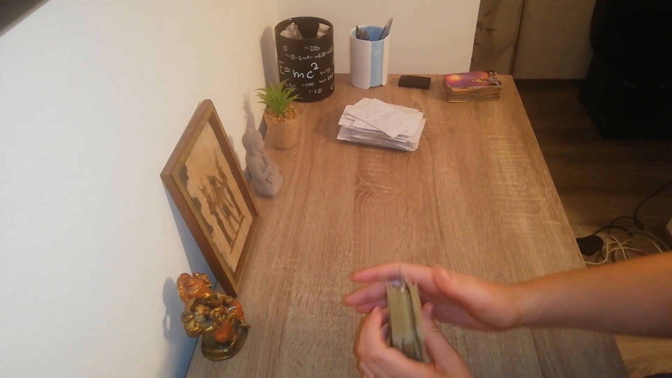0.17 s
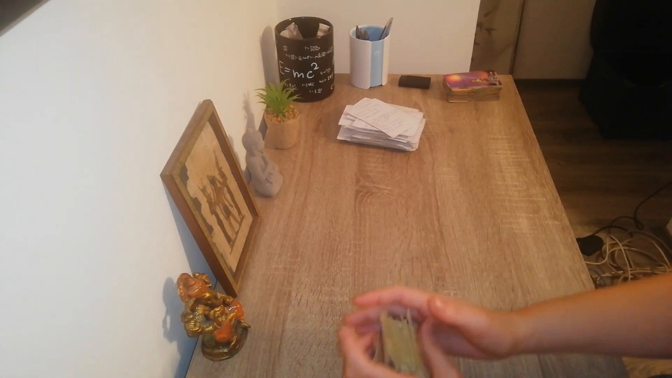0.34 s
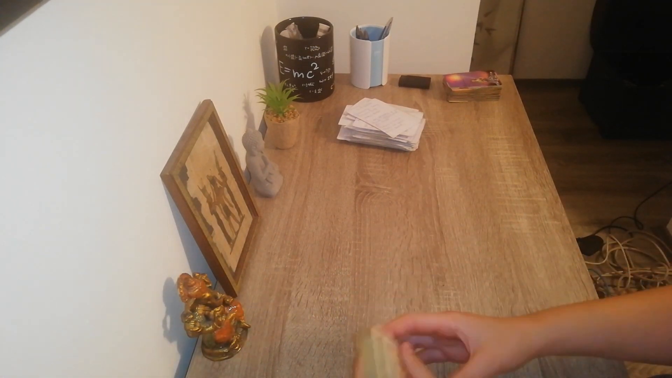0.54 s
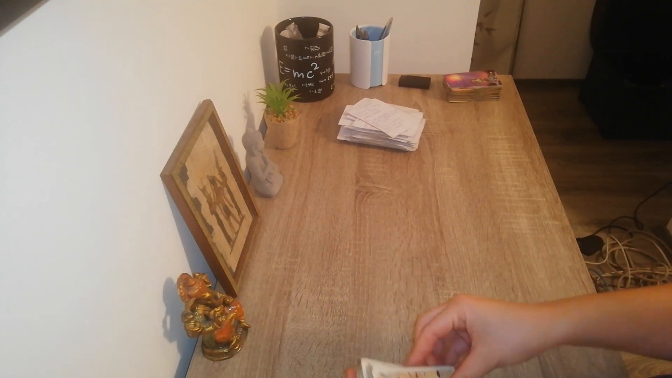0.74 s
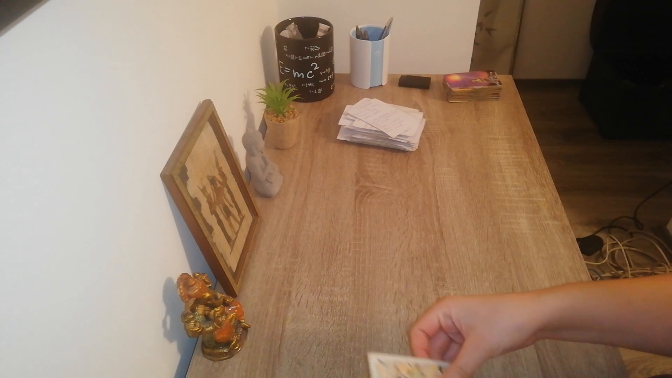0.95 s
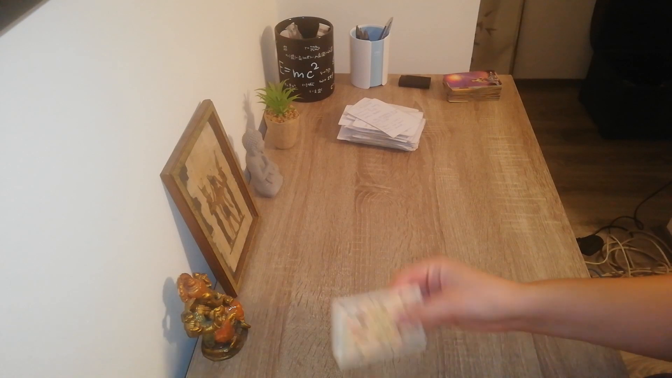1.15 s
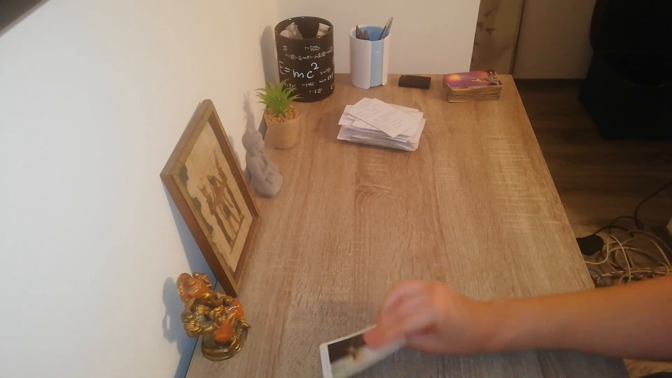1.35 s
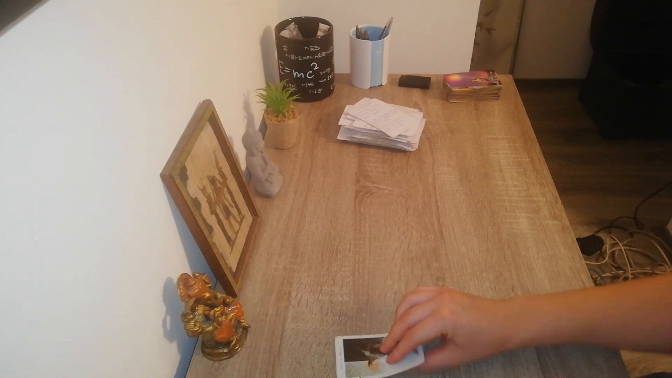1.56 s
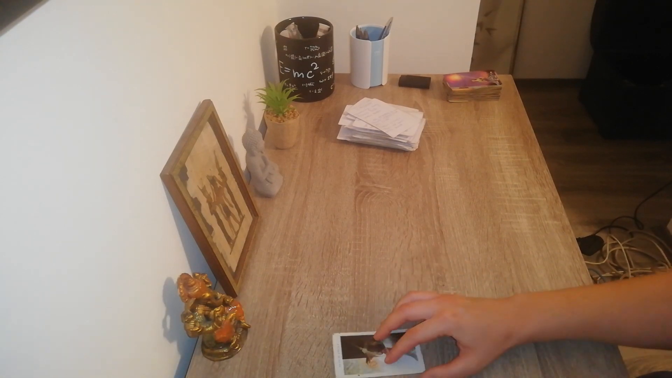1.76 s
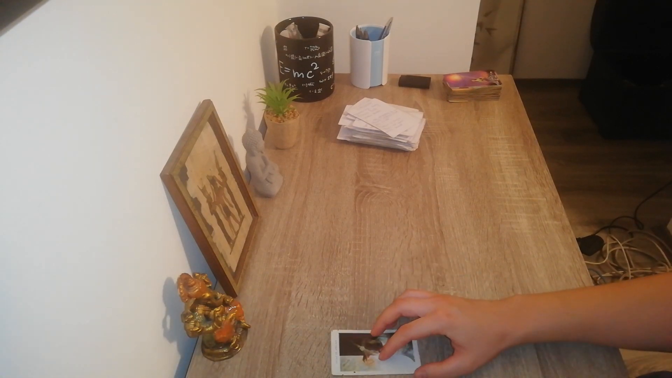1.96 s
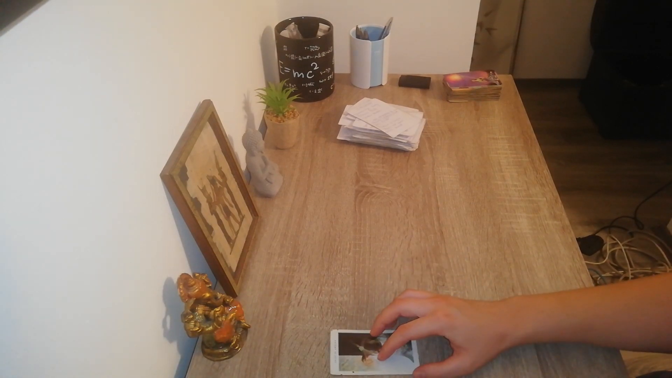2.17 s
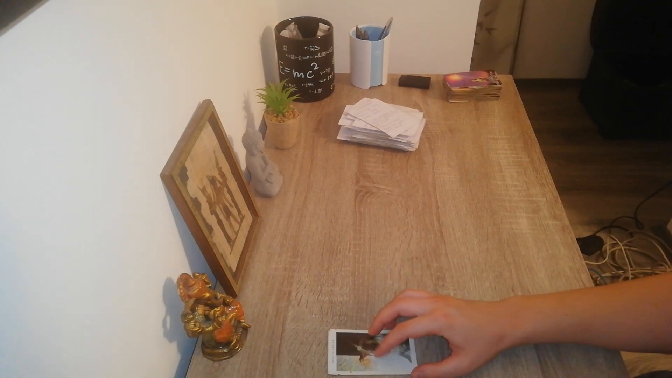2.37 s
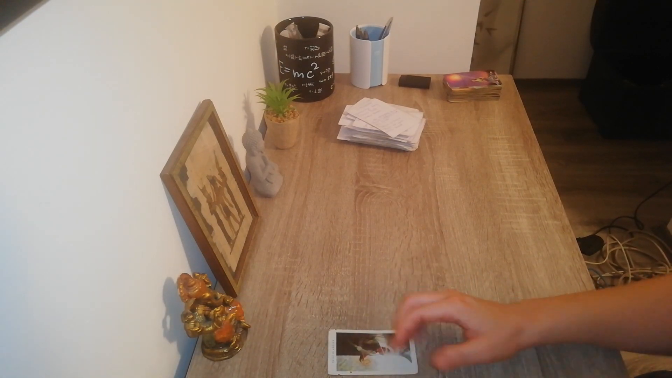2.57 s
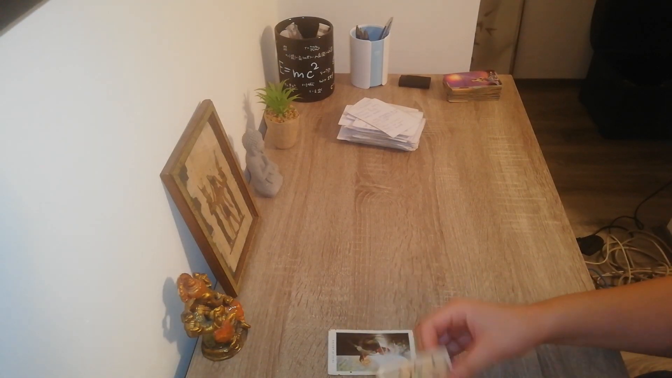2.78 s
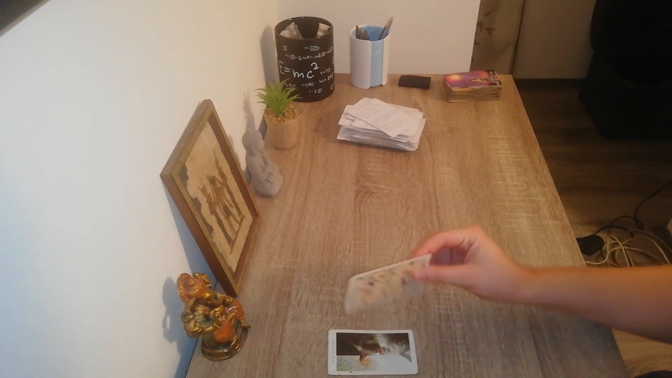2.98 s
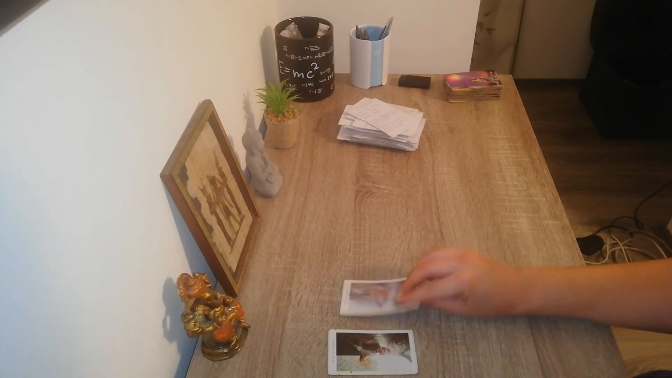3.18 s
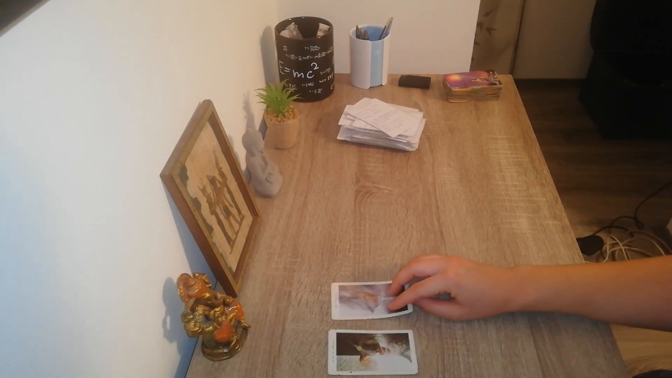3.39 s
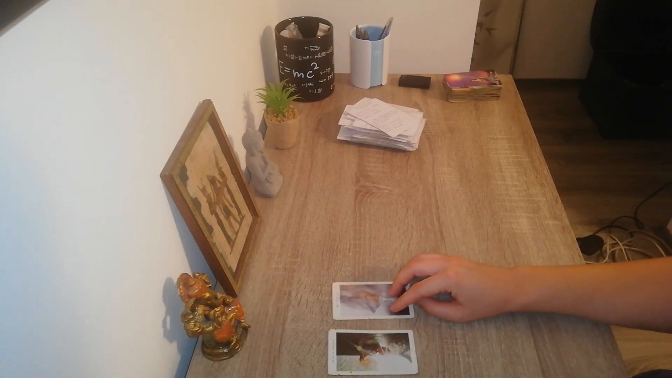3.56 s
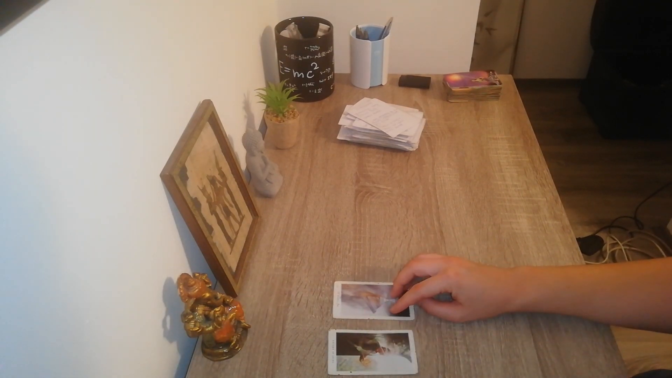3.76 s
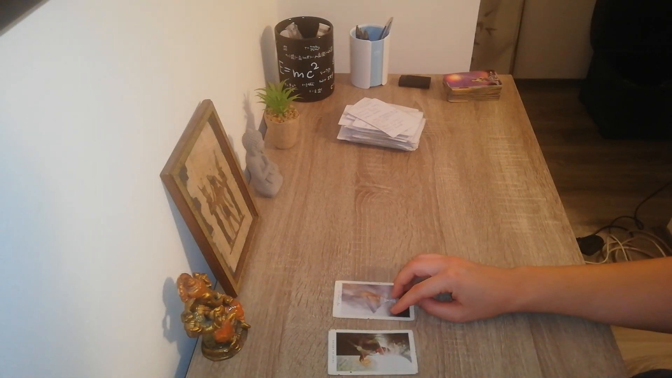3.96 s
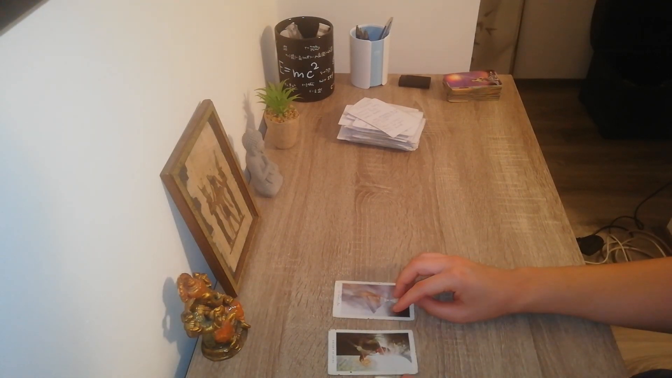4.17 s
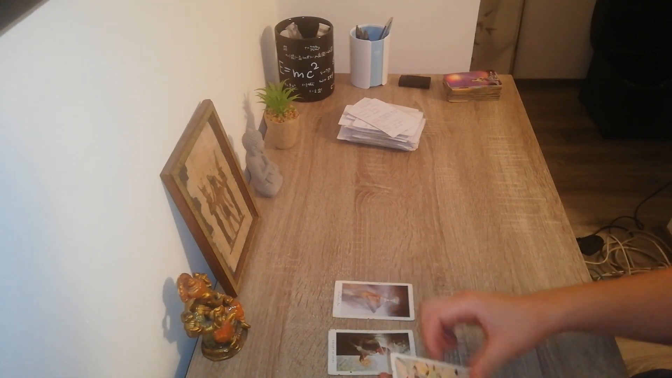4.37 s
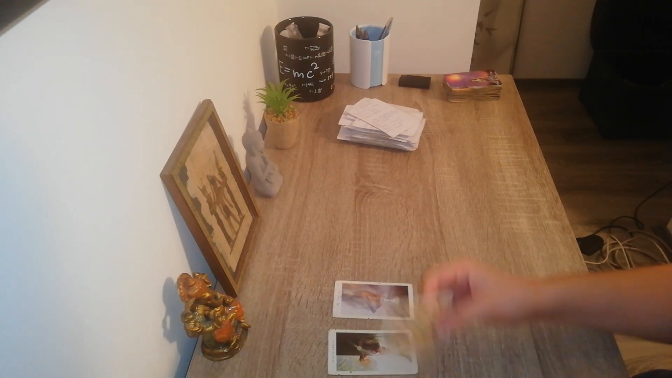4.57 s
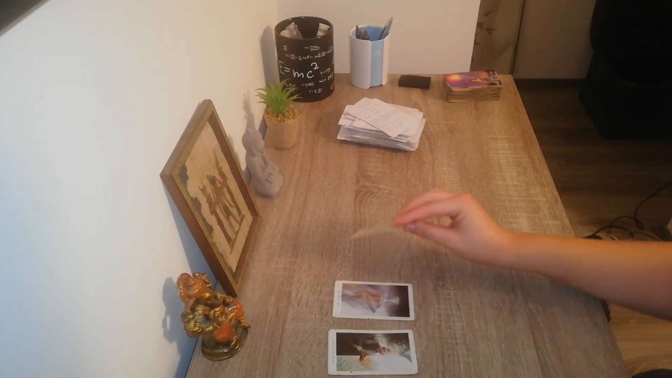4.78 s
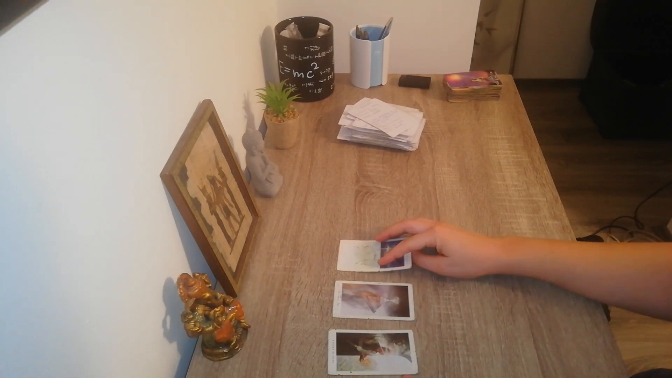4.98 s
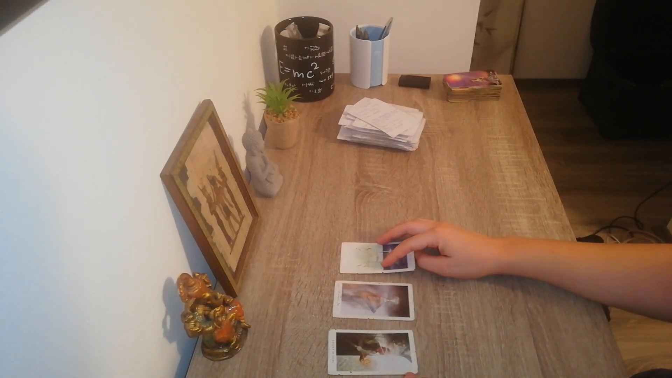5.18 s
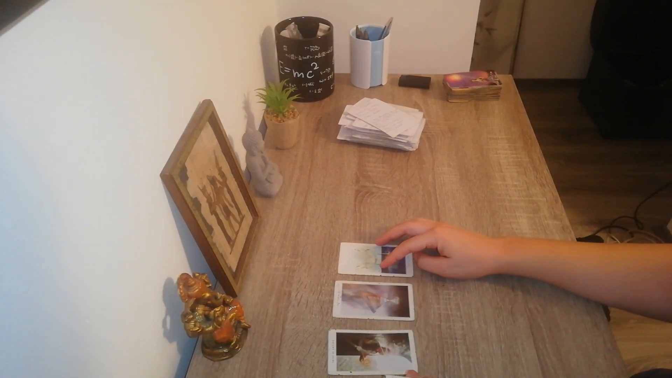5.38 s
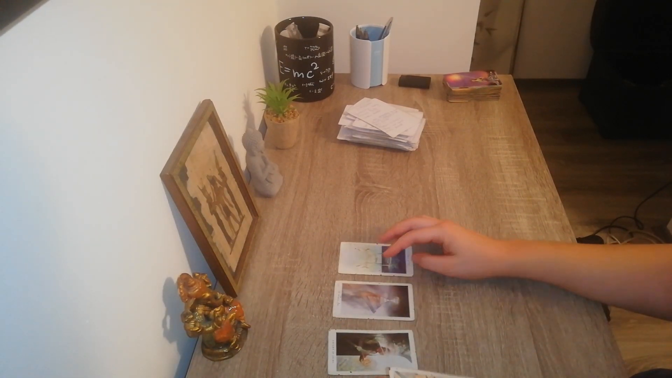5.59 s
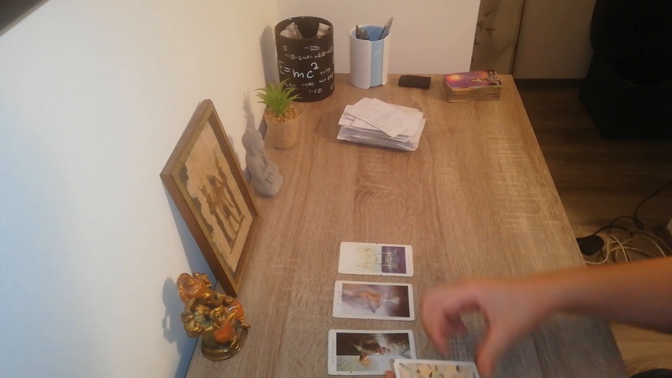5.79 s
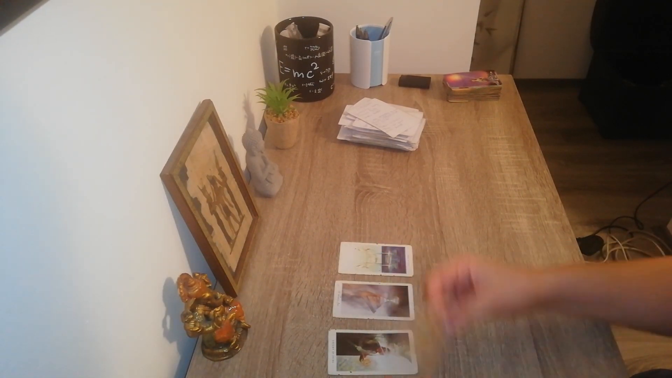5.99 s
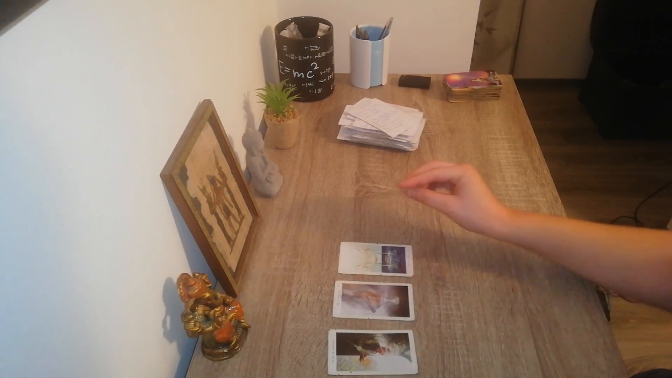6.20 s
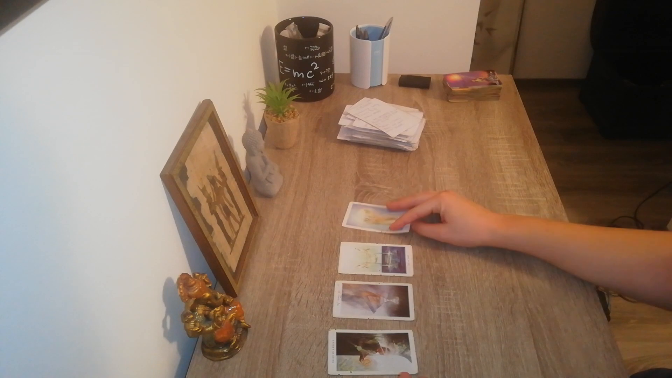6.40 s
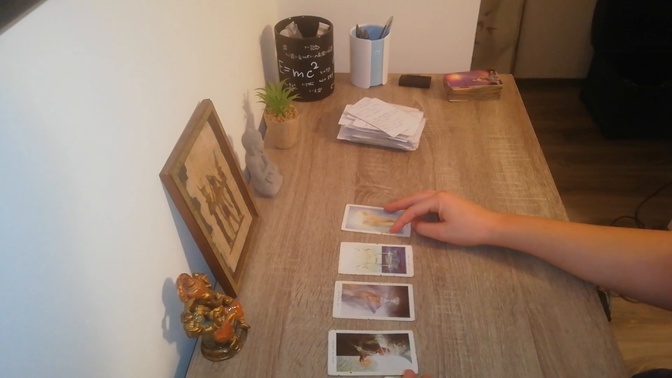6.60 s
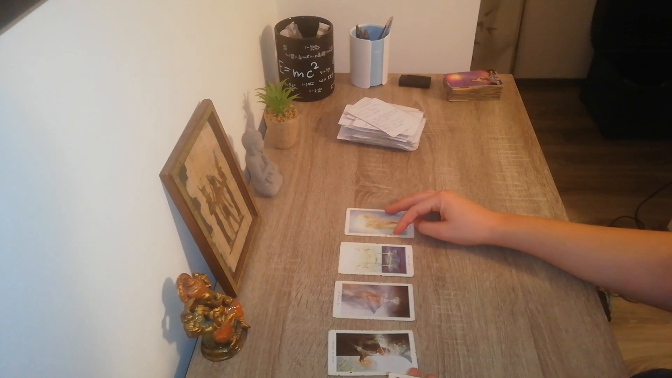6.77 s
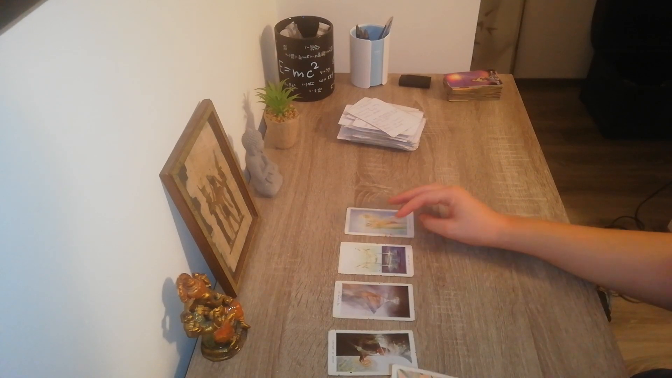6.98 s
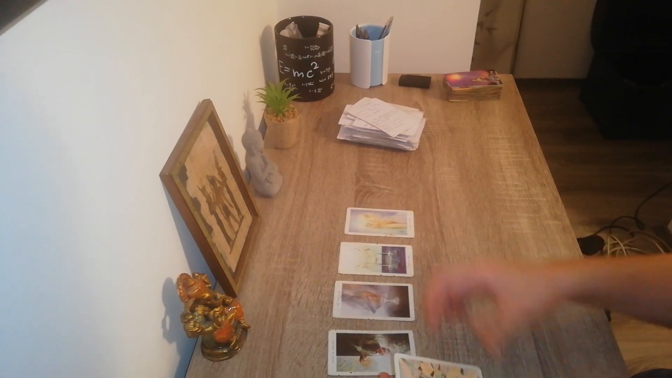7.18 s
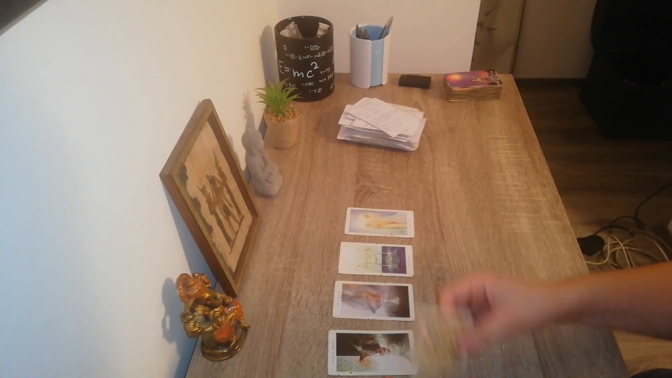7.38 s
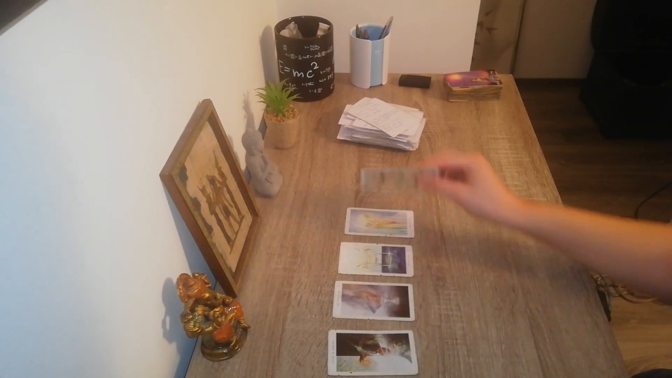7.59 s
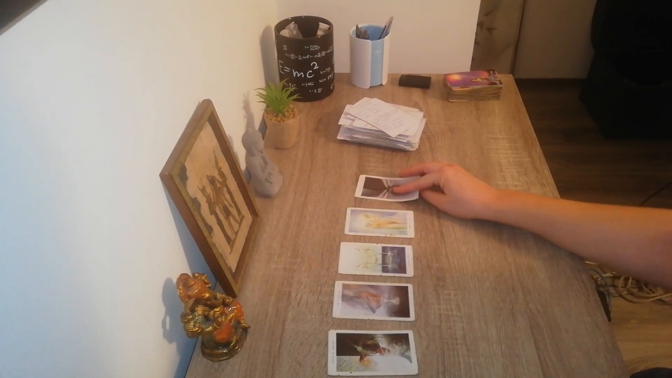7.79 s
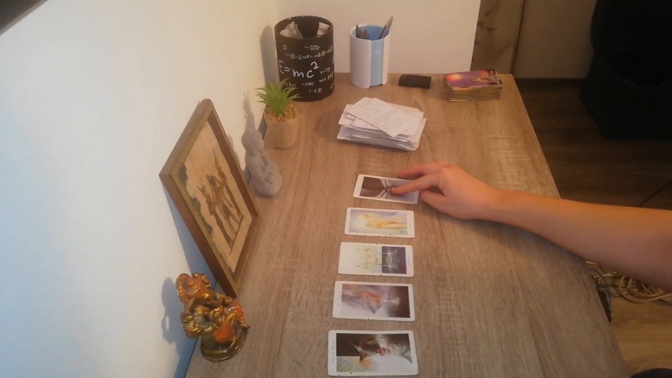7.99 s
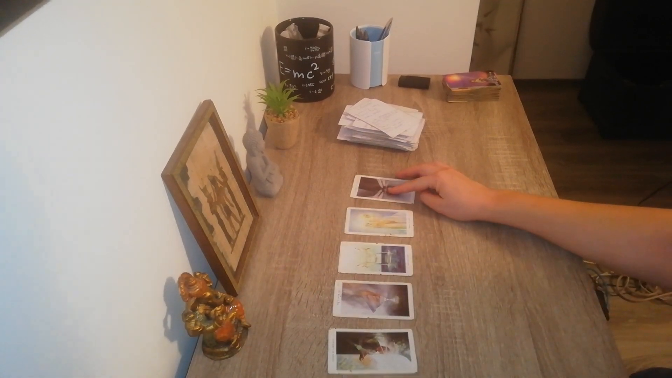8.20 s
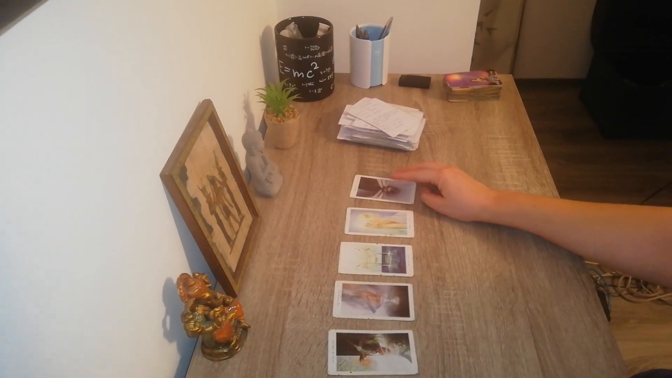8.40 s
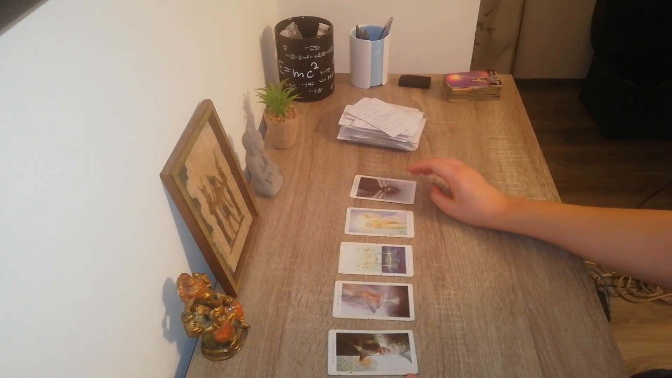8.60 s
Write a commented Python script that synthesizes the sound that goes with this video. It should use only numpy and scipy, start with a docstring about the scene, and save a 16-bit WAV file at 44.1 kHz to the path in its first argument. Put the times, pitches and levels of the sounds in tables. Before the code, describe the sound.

A small, quiet room with faint low rumble and soft hiss, heard closely in stereo. At the start a papery swish fades, then at about 0.4 seconds a deck of stiff cards is slapped square: a loud, dry, slightly doubled crack with a woody thump. Grainy rustling and small clicks follow until 1 second, and another sharp snap comes at 1.17. The first card is set down softly around 1.5 to 1.75. After near silence, a bright slide at 2.9 leads to a muffled tap at 3.2 to 3.3 and a crisp click at 3.57. Similar slide, flick and landing patterns come at 4.5 to 5.0, 5.9 to 6.4, with a firmer low thump at 6.4 and a click at 6.6, and 7.3 to 7.9. Light finger rubs fill in between. A tiny tick at 8.03 and faint touch end the handling, leaving quiet room noise until about 8.5.

```python
"""Stiff cards snap at their edges: a deck is slapped square, then cards are slid off it and laid on a wooden desk.
A snap is a short noise burst coloured by two bending modes; a slide is grainy friction noise in four bands.
Fingertips and deck thump the desk top, which rings in decaying low modes; a small bare room answers the cards.
Two spaced microphone ports, which brighten the snaps, listen over a faint room rumble and hiss."""
import sys
import numpy as np
from scipy import signal
from scipy.fft import rfft, irfft, next_fast_len
from scipy.io import wavfile
from scipy.ndimage import uniform_filter1d, map_coordinates

SR = 44100
rng = np.random.default_rng(int(sys.argv[2]) if len(sys.argv) > 2 else 0)


def generate_wav(signal):
    """Clip the signal to [-1, 1] and save it as 16-bit WAV at the path in sys.argv[1]."""
    frames = np.transpose(np.atleast_2d(signal))
    scaled = np.clip(frames, -1, 1) * 32767
    pcm = np.round(scaled).astype(np.int16)
    wavfile.write(sys.argv[1], SR, pcm)


N = 381444

# Steady background spectrum. Each row: frequency in Hz, relative density in dB per Hz.
FLOOR_SPECTRUM = [(12, -38), (20, 6), (27, -18), (59, -2), (113, -10.5), (149, -2.5), (197, -10),
                  (240, -11.5), (539, -19.5), (1110, -18), (2650, -23.5), (4760, -23), (6290, -25.5),
                  (8550, -22.5), (15800, -35.5)]
# Correlation of diffuse sound between the ports. Each row: frequency in Hz, likeness from -1 to 1.
PORT_LIKENESS = [(60, 1), (110, 0.93), (200, 0.38), (380, -0.41), (700, -0.33), (1290, 0.025),
                 (2380, -0.06), (4400, 0.088), (8120, -0.22), (15000, 0.079)]
# Reverberation of the room. Each row: frequency in Hz, time to fall 60 dB in s.
ROOM_DECAY = [(200, 0.57), (1000, 0.37), (4000, 0.4), (9000, 0.42), (14000, 0.067)]
# Colour the ports give to snaps. Each row: frequency in Hz, gain in dB.
PORT_COLOUR = [(500, 0.5), (650, -1), (900, 5), (5000, 3.5), (6500, 2), (9000, 6.5), (11000, -5.5),
               (13000, -13), (16000, -23.5)]

# Strokes of cards and fingers. Each row: start of full speed in seconds, rise in s, hold in s, fall in s,
# hiss level in dB, then brush, rasp and drone, each in dB relative to the hiss.
SLIDES = [(0.001, .02, .005, .06, -48.5, -4, -8, -8), (.19, .15, .12, 0.045, -59, -8.5, -5, -5),
          (0.36, .06, .01, 0.06, -50.5, -8, -14, -17), (.44, .03, 0.02, 0.34, -49.5, 10.5, 12.5, 6.5),
          (.575, .04, .04, .04, -46, -4.5, -16, -7), (.78, 0.018, .008, 0.033, -53.5, -7.5, -21, -20),
          (.82, .025, 0.0046, 0.033, -55.5, -19, -10, -13), (0.871, 0.017, 0.02, 0.073, -56.5, -8, -9, -17),
          (0.998, 0.036, 0.017, 0.057, -61, -6, -8, -25), (1.06, 0.061, .04, .05, -59, -8.5, -7, -34),
          (1.16, 0.09, .003, 0.02, -50, -3.5, -5.5, -23), (1.544, .1, 0.095, 0.043, -53, -7, -13.5, -13),
          (1.66, .05, .06, .05, -58, -2.5, 3, 5.5), (1.752, .05, 0.0138, .04, -56.5, -9, -17, -11),
          (2.747, 0.2, 0.043, 0.048, -66.5, -19, -12, -13),
          (2.863, 0.041, 0.033, 0.019, -49, -10, -16.5, -30),
          (2.92, .03, 0.0051, 0.028, -43, -2.5, -5.5, -18.5),
          (3.208, 0.032, 0.069, .06, -60, -16, -5.5, -12),
          (3.331, 0.032, 0.062, 0.08, -56.5, -7.5, -16, -6), (3.439, .06, .12, 0.027, -67, -0.5, -25, -23),
          (4.347, 0.056, .025, 0.05, -65, -10.5, -9, -3), (4.502, .15, .04, .05, -59, -19, -18, -18),
          (4.579, .025, .003, 0.034, -49, -16, -4, -28), (4.626, 0.037, .005, 0.024, -42.5, -5.5, -1, -16),
          (4.654, 0.024, .005, 0.035, -51, -3, -16, 2), (4.866, 0.17, .005, 0.13, -59.5, -10, -25, -29),
          (4.976, 0.0306, 0.02, 0.06, -52.5, -8, -2, -7), (5.717, .08, 0.013, 0.095, -59.5, -12, -9.5, -7),
          (5.843, 0.045, 0.01, 0.045, -64, -15, -22.5, -21), (6.023, .06, 0.0269, 0.025, -49, -8, -8, -31),
          (6.059, .04, 0.013, .05, -50, -3, -2, -12.5), (6.157, 0.031, 0.033, .08, -59.5, -12, -23, -29.5),
          (6.3, 0.095, .05, .03, -67, -12, -22.5, -23),
          (6.431, 0.048, 0.0049, 0.064, -48.5, -4.5, -3.5, -9),
          (6.508, 0.064, 0.028, .05, -56, -19, -17, -10), (6.665, 0.046, 0.0046, .1, -74, -4.5, -11.5, -8),
          (6.741, 0.05, 0.0041, .05, -67.5, -18, -17, 2.5),
          (7.094, 0.064, .03, 0.065, -61.5, -10, -11, -4.5), (7.247, 0.11, .03, 0.12, -64, -8, -15, -25),
          (7.439, 0.057, 0.0085, 0.084, -50.5, -2, 0.5, -11.5),
          (7.544, 0.1, 0.12, 0.068, -65.5, -9.5, -15, -27), (7.757, .06, .005, 0.045, -58.5, -10, -13, -20),
          (7.864, 0.045, .005, 0.089, -51, -1.5, -3.5, -7),
          (8.029, 0.065, 0.0032, .05, -63, -3.5, -11.5, -16)]
# Friction bands: hiss of the card face, its brush, the card's rasp, the desk's drone.
# Each row of the four: frequency in Hz, relative gain in dB.
FACE_HISS = [(3000, -61), (6000, -17.5), (9000, 3.5), (11000, -7.5), (13000, -24.5), (16000, -21.5)]
FACE_BRUSH = [(2000, -33.5), (3500, -1), (5000, -2), (6500, -3), (9000, -32)]
CARD_RASP = [(500, -30.5), (900, 0.5), (1400, -5.5), (2200, -6), (3000, -5.5), (5000, -37)]
DESK_DRONE = [(150, -28.5), (300, 5.5), (450, -0.5), (700, -5.5), (1200, -38.5)]
# Modes of a card dragged flat. Each row: frequency in Hz, linear gain.
FLAT_CARD_MODES = [(1420, 0.92), (2950, 0.31), (4500, 0.78)]

# Blows of fingertips and deck on the desk top. Each row: start in seconds, level in dB,
# hardness in dB per octave (modes above 150 Hz), gain in dB of modes from 100 to 150 Hz,
# low push in dB (modes below 100 Hz), contact time in s, share of free ring time left by the resting hand.
THUMPS = [(0.249, -65, 11, 2, -17, .0076, 0.34), (0.383, -41, 10.5, -7, -26, 0.0032, 1),
          (0.403, -31, 4.5, -3, -14.5, 0.0088, 1), (1.165, -62.5, 12.5, -7, -20, 0.0097, .6),
          (1.531, -44.5, -18, -6, -11, 0.0053, 0.82), (1.651, -52, 0.1, -4.5, -20.5, 0.0065, 1),
          (3.193, -50, -11, 8.5, -25.5, 0.0037, 0.62), (3.328, -41.5, -9.5, -5.5, -7.5, 0.0026, 0.7),
          (3.573, -49, -19, -13, -25.5, 0.0073, 0.59), (4.345, -51.5, -22, -2, -22.5, 0.0084, 0.69),
          (5.002, -42.5, -18.5, 2.5, -13, .007, 0.76), (5.722, -44.5, -39, 6, -24, 0.021, 0.66),
          (6.423, -35, -11, 5.5, -8.5, 0.0052, 0.8), (6.597, -46.5, -13, -15, -13, 0.0038, 0.63),
          (6.72, -60.5, -5, 2, -13, .007, 0.67), (7.086, -44.5, -32.5, -5, -18, 0.012, 0.8),
          (7.859, -40, -14, 3.5, -11.5, 0.0042, 0.76), (8.074, -64, -11, 1, -11, 0.0048, 0.53)]
# Modes of the desk top. Each row: frequency in Hz, level in dB, free time to fall 60 dB in s.
DESK_MODES = [(64.88, 5, .45), (143, -6.5, 0.63), (165, 4, .58), (195, -10.5, 0.44), (226.3, 3, .4),
              (308.5, 2, 0.2), (340, -8, 0.21), (460.5, -6, 0.41)]

# Snapping card edges, plus at 0.407 s the bright, dry first crack of the slapped deck. Each row: start in
# seconds, peak in dB before room and pan, low mode in Hz, its linear gain, # high mode in Hz, its linear gain,
# brightness in dB per octave, body at 300 Hz in dB, room level in dB.
SNAPS = [(0.2008, -49.5, 1030, 5.8, 3320, .7, -15, 13, 5.5),
         (0.251, -44, 990, 2.4, 3670, 0.95, -0.8, 9, 10), (0.384, -10, 1690, 2.2, 3220, 1.8, -4, -2, 5.5),
         (0.4072, -11.5, 1499, .3, 3700, 0.75, 1.5, -9.5, -13),
         (0.6085, -41, 1450, 0.93, 6400, 1.4, -1, 5, 8), (0.718, -34, 1509, 0.42, 6380, .6, 19, -9, -8),
         (0.8195, -40.5, 1390, .8, 5850, 1.5, -1, -15.5, 3), (0.9711, -41, 1700, 1.1, 6500, .6, 1, -14, 5),
         (1.1676, -14.5, 1190, 0.17, 4200, 1.05, 4, 5.5, -2),
         (1.4297, -44, 870, 7.4, 3290, 0.28, -1.5, 10.5, 6.5),
         (1.529, -41.5, 1500, 0.73, 3200, 0.27, 0, 15.5, 8),
         (1.6502, -39.5, 1120, 1.1, 3430, 0.81, -2, 10, 13), (1.7494, -39, 1210, .4, 5220, 3.4, 1.5, -2, 0),
         (2.797, -52, 980, 1.4, 3150, 1.1, -4, -5, 2.5), (3.1949, -40, 1130, 1.6, 2940, 0.28, -11, 13.5, 7),
         (3.2929, -43, 1700, .4, 2900, 1.8, 3, -6, 4.5),
         (3.3283, -43.5, 1750, 0.83, 2900, .9, -6.5, 24, 10), (3.5722, -24, 1685, 4.1, 4700, 9.8, 4, 9, 0),
         (4.2583, -50, 1000, 1.1, 2610, 0.58, 6, -5, 3.5), (4.3427, -46, 2100, 1.3, 3500, 1.1, 1, -8, 2.5),
         (4.4887, -43.5, 1320, 8.5, 2930, 0.45, 0.5, 2, -.1),
         (4.5261, -36, 1020, 4.5, 2700, 0.49, 2.5, 10, 3.5), (4.6218, -29, 1650, 2.2, 4340, 1.3, -5, -1, 8),
         (4.9457, -24.5, 1210, 3.9, 3670, 0.79, 2, -8, 7.5),
         (5.001, -37, 1640, 1.6, 4040, 0.82, .8, -12, 8),
         (5.3785, -49.5, 1114, .6, 6300, 0.92, 7.5, -2.5, 4.5),
         (5.4555, -44.5, 1270, .6, 6000, .7, 14, -12.5, -3),
         (5.9286, -38, 1380, 10.5, 3250, 0.24, 2.8, 10, 5.5),
         (6.1325, -38.5, 1220, 0.27, 3120, 0.47, 8, -8, -3),
         (6.1639, -49, 1320, 0.33, 5760, .5, 4, -6, 4.5), (6.3766, -42, 1445, 1.5, 2770, .6, .8, -11, 8),
         (6.3824, -30, 1400, 3.5, 3280, 0.77, 1.5, 4, 10), (6.5968, -38, 1070, .4, 5480, 4.4, 12, -2, 5),
         (7.3262, -31, 1380, 7.2, 4520, 1.6, 1.5, 9, 7), (7.3877, -30.5, 1400, 3.6, 2770, 0.57, 0, 4, 6),
         (7.4222, -34.5, 1300, 2.2, 2930, 0.67, -3.5, -9, 2),
         (7.8162, -28.5, 1890, 0.44, 3130, 1.3, 1.5, -5, 7.5),
         (7.8676, -36, 1310, 0.36, 3660, 1.1, 7, 10, 7), (8.0294, -49, 1510, 0.75, 6320, 1.1, 3, 0.5, -2.5)]
# The whole deck slapped square. Each row: the same columns as the snaps.
SLAP = [(0.4017, -8.5, 1520, .3, 4004, .7, -5, -1.7, 7.6)]
# Tint of a card held in the usual way. Each row: frequency in Hz, gain in dB.
CARD_TINT = [(1200, -2.5), (2800, 0.5), (5000, -1.5), (9000, 0.5)]

FLOOR_DB = -62
LAG = 27  # samples by which the left port hears the cards later
TOP_HZ = 15830
SWELL_DB = 20  # gained over a rise, lost over a fall
GRIP = 1.5  # the deeper layers swell this much more steeply than the hiss
ROUND = 1.05  # over 1: the swell eases into full speed
SNAP_RISE_S, SLAP_RISE_S = .0006, .003
LOW_Q, HIGH_Q = 8, 4.5  # sharpness of the two bending modes; flat card modes share the first
LEAD_S = .005  # silence ahead of a snap


def amp(db):
    """Amplitude ratio is ten to the power of dB over 20."""
    return 10 ** (np.asarray(db) / 20)


def unit(x):
    """Normalization divides a signal by its root mean square."""
    return x / np.sqrt(np.mean(x ** 2) + 1e-20)


def along(points, hz):
    """Interpolation joins (Hz, value) points linearly on a logarithmic frequency axis."""
    f, v = np.transpose(points)
    return np.interp(np.log(hz + 1), np.log(f + 1), v)


def filtered(x, response):
    """Linear filtering multiplies the spectrum by a frequency response."""
    m = next_fast_len(x.shape[-1] + 4096)
    spectrum = rfft(x, m) * response(np.fft.rfftfreq(m, 1 / SR))
    return irfft(spectrum, m)[..., :x.shape[-1]]


def mode(f, c, q):
    """Resonance: a damped oscillator responds most strongly at its own frequency, c Hz."""
    return 1j * f * c / q / (c * c - f * f + 1j * f * c / q)


def wobble(rate):
    """Slow fluctuation: a smooth curve through random knots, rate of them a second."""
    knots = rng.standard_normal(int(N * rate / SR) + 4)
    return map_coordinates(knots, [np.arange(N) * rate / SR])


def diffuse(size):
    """Diffuse-field coherence: noise at two spaced ports is nearly alike only in the bass."""
    def shares(hz):
        turn = np.arccos(np.clip(along(PORT_LIKENESS, hz), -1, 1)) / 2
        return np.array([np.cos(turn), np.sin(turn)])
    mid, side = filtered(rng.standard_normal((2, size)), shares)
    return np.array([mid + side, mid - side])


def heard(x, pan_db, room_db):
    """Room response: direct sound, later on the left, then quick desk and wall echoes and a decaying tail."""
    size = SR // 2
    hz, t, z = signal.stft(diffuse(size), SR, nperseg=128)
    room = amp(-60 * t / along(ROOM_DECAY, hz)[:, None])
    quick_echoes = amp(6.5 - 60 * t / 0.1)
    tail = signal.istft(z * (room + quick_echoes), SR, nperseg=128)[1][:, :size]
    arrive = np.clip(np.arange(size) / SR / .003, 0, 1)
    tail = tail * arrive * amp(room_db) / np.linalg.norm(tail[0])
    tail[[0, 1], [LAG, 0]] += 1  # the direct sound
    return signal.fftconvolve(x[None], tail, axes=1) * amp([[pan_db / 2], [-pan_db / 2]])


def add(out, s, x):
    """Superposition: x is summed into out from second s."""
    part = out[:, round(s * SR):][:, :x.shape[1]]
    part += x[:, :part.shape[1]]


def floor():
    """Stationary noise: room rumble and port hiss share one spectrum, breathing a little in level."""
    noise = unit(filtered(diffuse(N), lambda f: amp(along(FLOOR_SPECTRUM, f))))
    return amp(FLOOR_DB + 0.17 * wobble(1.7)) * noise


def friction_grit():
    """Stick-slip friction: fine noise grains of uneven size, as the edge catches and slips."""
    catch = amp(2.8 * wobble(150) + 0.83 * wobble(30))
    size_db = np.clip(2.5 * rng.exponential(size=N), 0, 16)  # a few grains stand out
    return catch * rng.standard_normal(N) * amp(size_db)


def slides():
    """Sliding friction: one grit excites hiss, brush, rasp and drone, all swelling with the stroke."""
    out, grit = np.zeros((2, N)), friction_grit()

    def layer(band):
        flex = lambda f: 1 + sum(gain * mode(f, hz, LOW_Q) for hz, gain in FLAT_CARD_MODES)
        return unit(filtered(grit, lambda f: amp(along(band, f)) * flex(f)))

    face, brush, rasp, drone = map(layer, (FACE_HISS, FACE_BRUSH, CARD_RASP, DESK_DRONE))
    for s, rise, hold, fall, hiss_db, brush_db, rasp_db, drone_db in SLIDES:
        first = max(round((s - 2 * rise) * SR), 0)
        last = min(round((s + hold + 2 * fall) * SR), N)
        k = np.arange(first, last)
        before = (s - k / SR) / rise
        after = (k / SR - s - hold) / fall
        below_db = -SWELL_DB * np.maximum(np.maximum(before, after), 0) ** ROUND
        deep = amp(brush_db) * brush[k] + amp(rasp_db) * rasp[k] + amp(drone_db) * drone[k]
        mix = amp(below_db) * face[k] + amp(GRIP * below_db) * deep
        # dividing by the local strength of the grit keeps the stroke at its level
        local_power = np.average(grit[k] ** 2, weights=amp(2 * below_db))
        mix = mix / np.sqrt(local_power / np.mean(grit ** 2))
        add(out, first / SR, amp(hiss_db) * heard(mix, pan_db=-0.8, room_db=-0.5))
    return out


def thumps():
    """Modal excitation: a soft push rings the desk's low modes, alike at both ports; a harder one reaches higher."""
    out, t = np.zeros((2, N)), np.arange(SR // 2) / SR
    for s, db, hard_db, lower_db, push_db, contact, free in THUMPS:
        ring = 0
        for hz, level_db, t60 in DESK_MODES:
            if hz > 150:
                tilt_db = hard_db * np.log2(hz / 163)
            else:
                tilt_db = lower_db if hz > 100 else push_db
            # neighbouring modes blur the ring: its phase wanders
            waver = np.cumsum(rng.standard_normal(len(t))) * 1.2 / np.sqrt(SR * t60)
            decay = amp(level_db + tilt_db - 60 * t / (t60 * free))
            ring = ring + decay * np.sin(2 * np.pi * hz * t + waver)
        # the whole desk rocks at 32 Hz
        sag = amp(push_db + 1.5) * np.sin(2 * np.pi * 32 * t) * amp(-60 * t / .3)
        press = np.sin(np.pi / 2 * np.clip(t / contact, 0, 1)) ** 2
        add(out, s, amp(db) * ((ring + sag) * press)[None])
    return out


def snap_bursts(rows, rise):
    """Impulsive bending: a short rough burst, tinted by the card's hold, rings through two bending modes."""
    out, t = np.zeros((2, N)), np.arange(2048) / SR - LEAD_S
    for s, db, low_hz, low, high_hz, high, bright_db, body_db, room_db in rows:
        u = np.clip(t / rise, 0, None)
        z = rfft(rng.standard_normal(len(t)) * u * np.exp(-u))
        # dividing by the smoothed magnitude evens out the spectrum
        burst = irfft(z / uniform_filter1d(abs(z), size=7)) * (t >= 0)
        tone = [(300, body_db)]
        for hz, level in CARD_TINT:
            tone.append((hz, level + bright_db * np.log2(hz / CARD_TINT[1][0])))

        def response(f):
            card = 1 + low * mode(f, low_hz, LOW_Q) + high * mode(f, high_hz, HIGH_Q)
            return card * amp(along(tone, f) + along(PORT_COLOUR, f)) * (f > 180)

        burst = filtered(burst, response)
        add(out, s - LEAD_S, amp(db) * heard(burst / abs(burst).max(), -2.5, room_db))
    return out


def snaps():
    """Sudden release: single card edges excite their bending modes with a fast rise; one dry row at 0.407 s
    gives the slapped deck its bright first crack."""
    return snap_bursts(SNAPS, SNAP_RISE_S)


def slap():
    """Extended impact: the whole deck, slapped square, excites its modes with a slower rise."""
    return snap_bursts(SLAP, SLAP_RISE_S)


def scene():
    """Superposition: background, friction, desk blows and card snaps add linearly."""
    return floor() + slides() + thumps() + snaps() + slap()


def record(dry):
    """Band limitation: nothing is kept from the top frequency up."""
    return filtered(dry, lambda hz: hz < TOP_HZ)


dry = scene()
out = record(dry)
generate_wav(out)
```